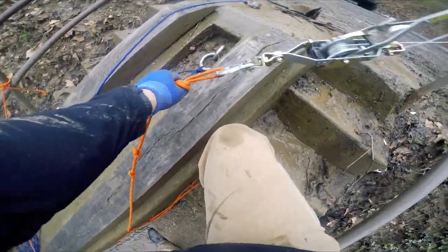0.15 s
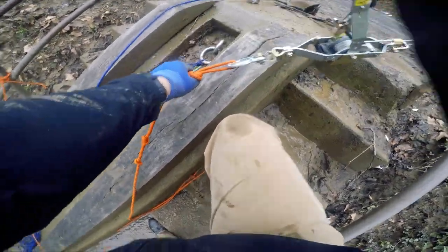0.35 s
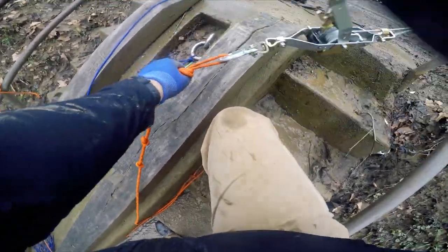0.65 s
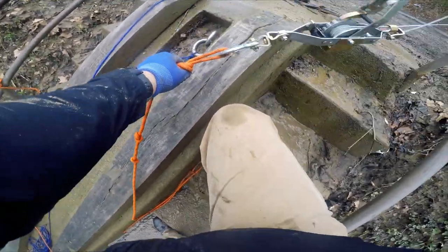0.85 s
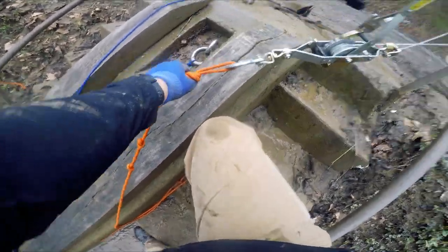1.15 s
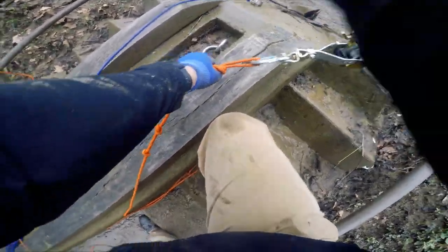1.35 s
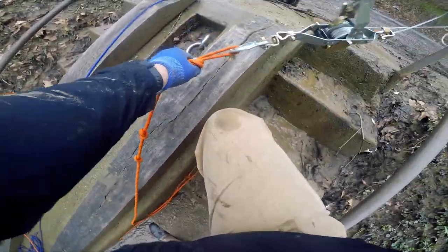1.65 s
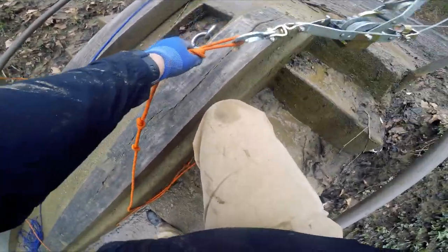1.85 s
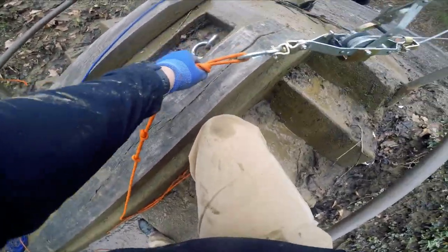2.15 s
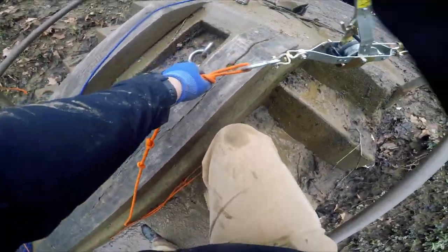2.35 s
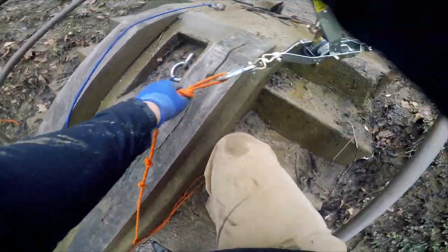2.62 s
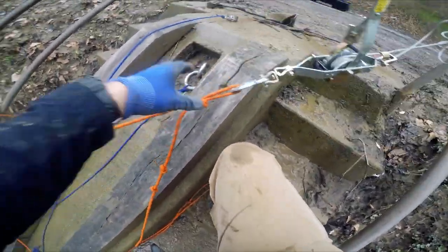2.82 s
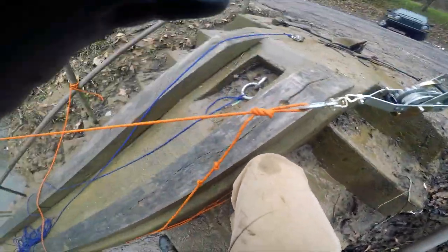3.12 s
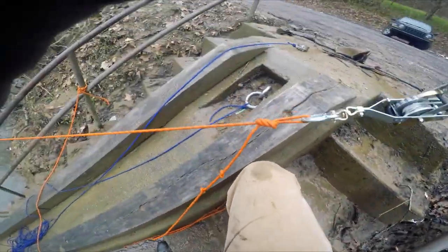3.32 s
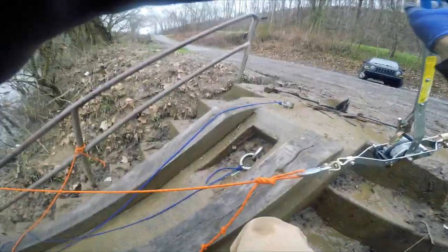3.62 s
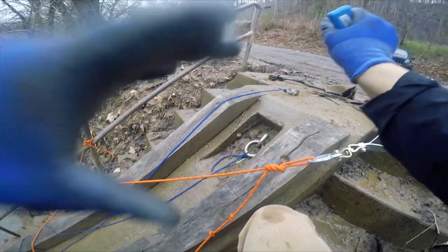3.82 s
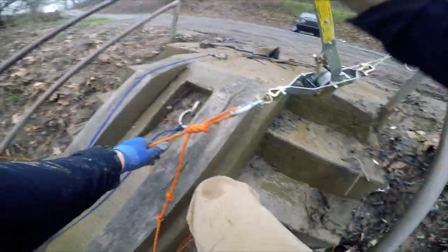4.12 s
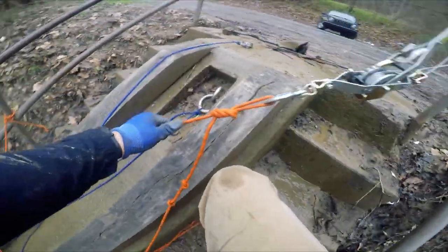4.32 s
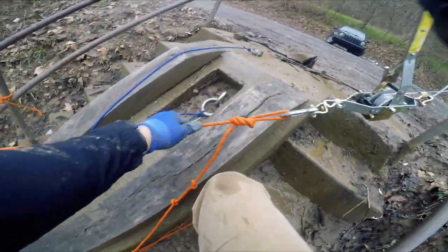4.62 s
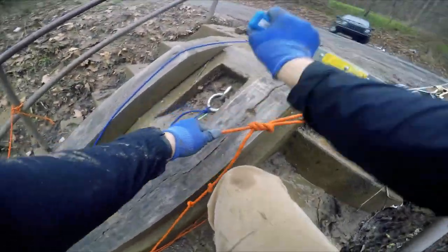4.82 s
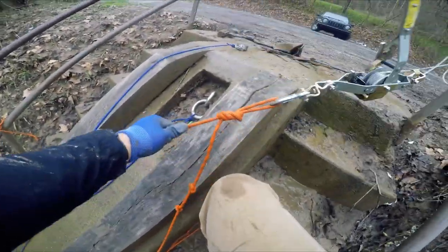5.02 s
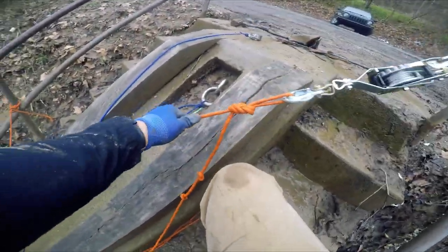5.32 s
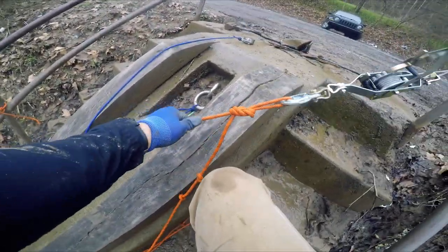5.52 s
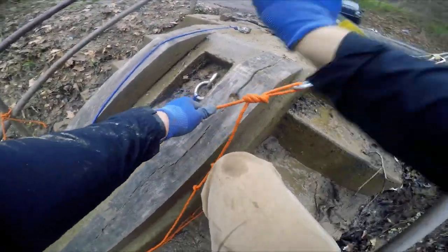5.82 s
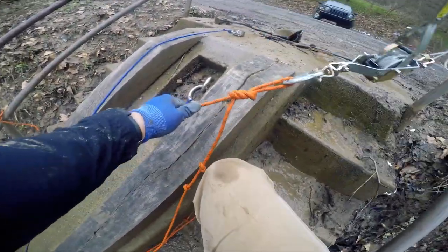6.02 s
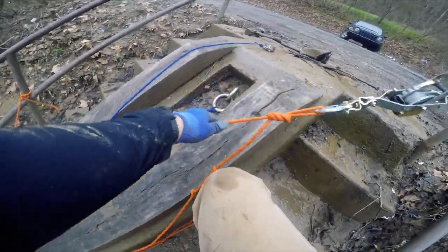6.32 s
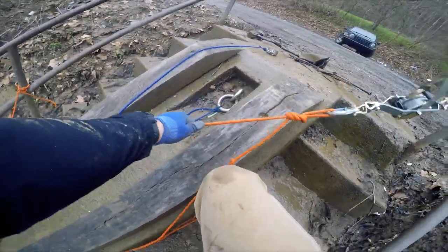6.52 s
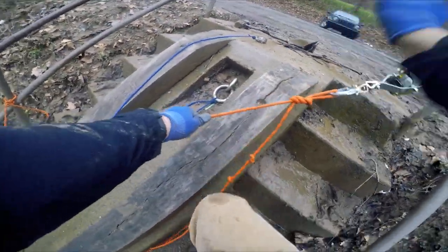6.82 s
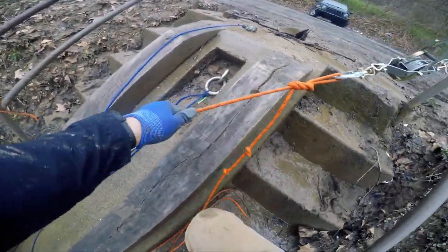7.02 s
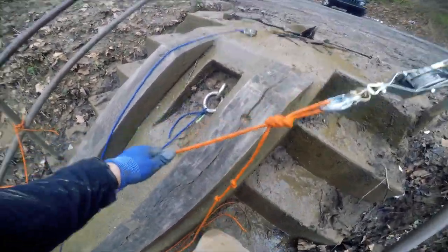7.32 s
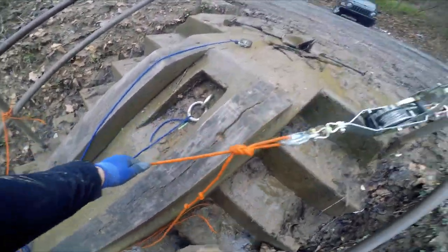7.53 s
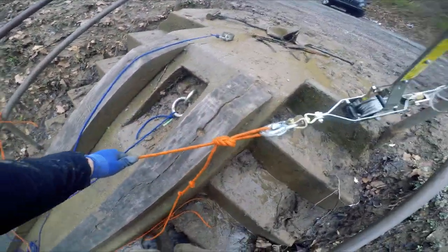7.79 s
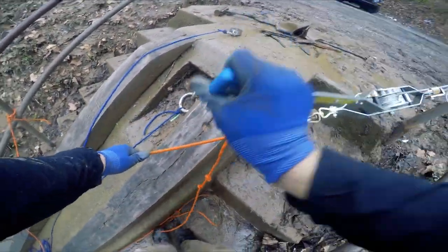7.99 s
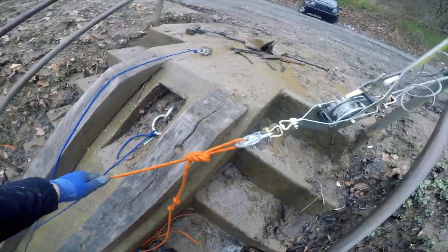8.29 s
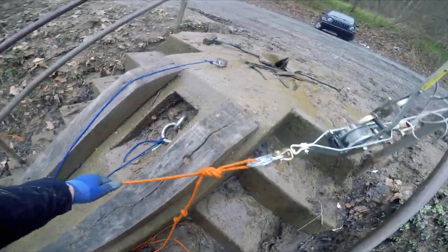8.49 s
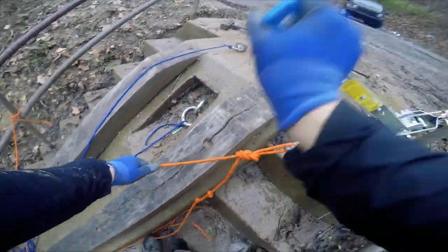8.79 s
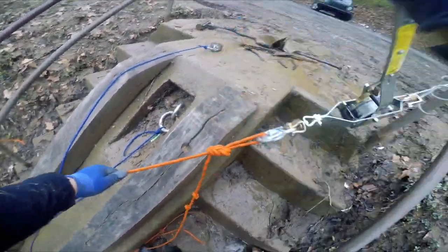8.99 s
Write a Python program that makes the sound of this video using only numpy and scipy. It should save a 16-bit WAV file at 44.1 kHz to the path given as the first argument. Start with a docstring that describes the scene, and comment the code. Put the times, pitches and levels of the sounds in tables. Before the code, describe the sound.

A hand-pumped ratchet winch clicks and snaps sharply in uneven bursts, its handle and hooks clanking, with jacket rustle and soft bumps near the microphone outdoors.

```python
"""On a river bank, a lever ratchet winch is pumped under load, an arm's length from a head-worn camera.
Pawls (small catches) slide up the teeth and snap down, ringing the steel; handle and hooks clank and rattle.
The steel is a crowd of decaying tones; rubbing, jacket, cable and hush are coloured noise.
Bumps on the camera mount are short low tones, and a gloved hand brushes past once with a knuckle tap.
One brief creak is a wavering tone; a faint outdoor hush with a far-off drone lies under it all."""
import sys
import numpy as np
from scipy import signal
from scipy.fft import rfft, irfft, next_fast_len
from scipy.io import wavfile
from scipy.ndimage import uniform_filter1d

SR = 44100
rng = np.random.default_rng(int(sys.argv[2]) if len(sys.argv) > 2 else 0)


def int16_out(signal):
    """Quantize to a 16-bit WAV file."""
    q = np.round(np.clip(np.atleast_2d(signal).T, -1, 1) * 32767)
    wavfile.write(sys.argv[1], SR, q.astype(np.int16))


N = 403506  # length of the scene in samples

# pawl snaps, a few times per stroke, and a few faint ticks of loose parts:
# (time [s], level before trim [dB], push of low modes before sharing [dB], left over right [dB])
SNAPS = [(0.2961, -22, -1.5, -2), (.328, -33.5, -9, 8), (0.3613, -16.5, -0.5, 2.5), (0.4305, -20, -0.5, 2),
         (.502, -43, 2.5, 0), (.588, -36, 0.5, 1), (0.767, -18.5, -0.5, -8), (0.8506, -18, -4.5, -3),
         (0.9184, -18, -3.5, 1), (1.2219, -17.5, -3, 3), (1.2998, -18, -9.5, 1), (1.3828, -18.5, 4.5, 3.5),
         (1.464, -23.5, 0, 2.5), (1.7189, -14.5, 1, -2), (1.8033, -19, -2.5, -0.5),
         (1.8731, -17.5, -3, 4.5), (2.2394, -17.5, -10, 2.5), (2.337, -18.5, -2, 2.5),
         (2.4311, -16, 1.5, -8), (2.9157, -19, -4.5, -6.5), (3.5839, -17, -4.5, 2.5),
         (3.7222, -18.5, -10.5, 9), (4.2891, -17, 2, 0.5), (4.3491, -20, -12.5, -1), (4.5977, -14, -4, 0),
         (4.6675, -19.5, -3.5, 0), (4.7333, -18.5, 1, 1.5), (4.7928, -18.5, -2.5, 1.5),
         (4.806, -23, 3, 2.5), (4.898, -33, 2, -2), (5.0517, -15, 0, 3), (5.1096, -19, -10.5, 1),
         (5.1612, -19.5, -4.5, 1), (5.2536, -19.5, -7.5, 1.5), (5.5691, -20.5, -3, 1),
         (5.6447, -19.5, -8.5, 0), (5.7304, -16.5, 1.5, 2), (5.8052, -22.5, -1, 0),
         (6.023, -18.5, -4.5, -11.5), (6.0942, -19.5, -5.5, -1), (6.162, -17.5, -4, 1),
         (6.5346, -21.5, 0.5, -2), (6.5746, -14, -2.5, -1), (6.656, -16, -7, -1), (6.751, -35, 0, 2),
         (6.814, -32, 4, -2.5), (6.8951, -20, 9.5, 1.5), (7.1317, -20, -9, -4.5), (7.235, -15, -3.5, 2),
         (7.8988, -13.5, -1, 2.5), (7.9844, -21.5, 11, 1), (8.0562, -22.5, -0.5, -3), (8.1102, -18, 6, 3.5),
         (8.2719, -17, -5, -2), (8.335, -20.5, -2.5, -1), (8.714, -22.5, -9.5, 3), (8.7905, -22, 1.5, -3),
         (8.854, -38, 1, -1), (8.9152, -35.5, 4, 0), (9.0281, -15, 5, 1), (9.0951, -16.5, -3.5, -9)]
# the handle turns over or takes up slack: (time [s], level before trim [dB],
# push of low modes before sharing [dB], left over right [dB], chatter of loose parts before shaping [dB])
CLANKS = [(0.0593, -41.5, 17, 3, -44), (0.087, -46, 21, -1, -46.5), (0.132, -45.5, 8, -2, -50),
          (0.2278, -38, -2, 4, -39), (0.6595, -23.5, 11, -1.5, -38), (0.68, -35, 23, -2, -35),
          (0.7077, -20, 8, 4, -30.5), (1.1382, -24, -1, 2, -28.5), (1.2835, -28, 9, 2, -50.5),
          (1.335, -35.5, 1, -1, -42), (1.4243, -34.5, 9, 6, -34), (1.5674, -32, -2.5, -4, -53),
          (1.6201, -19.5, 5, 6, -39), (1.667, -20, 3.5, -1, -27.5), (2.1131, -24, 0, -10, -29),
          (2.6342, -24.5, 15.5, 6.5, -40), (2.675, -24, 10.5, 0, -44), (2.789, -29, -5, -1, -41),
          (3.0343, -34.5, 3, -3, -51), (3.8926, -28.5, 0, 1, -52), (4.0448, -31.5, 15, 1.5, -55),
          (4.0772, -35, 16, 2, -47), (4.228, -28, 0, 8, -38), (4.513, -23.5, 5.5, 0, -40),
          (4.5375, -24, -1, -6.5, -27), (4.97, -23, 1.5, -9, -42), (4.9918, -24, 35, 2, -46),
          (5.0172, -22, 6, -2, -28), (5.499, -32.5, -13, -4, -41.5), (5.8692, -30.5, 8.5, 0.5, -53),
          (5.9305, -20, 15, -1.5, -52), (5.961, -38, 24, -1, -49), (5.9798, -19.5, 10, 0, -36),
          (6.305, -26, -4.5, -5, -28.5), (6.5009, -21, -8, 0, -50.5), (6.6251, -29.5, 8, 1, -57),
          (6.717, -38, -11, 4, -45), (6.92, -47, 10, -6, -45), (6.951, -22.5, 2.5, 0, -32),
          (7.0462, -37, -3, -7, -38.5), (7.5195, -21, 4, -10, -24.5), (7.699, -35, -1, -7, -42),
          (7.814, -28, -6, -9, -30.5), (7.9624, -18, 4.5, -2.5, -40), (8.1588, -23, 5, -0.5, -35),
          (8.2025, -25, 3.5, -5, -35), (8.38, -43.5, 27, 0, -60), (8.482, -23.5, 9, -3, -60),
          (8.5044, -22.5, -0.5, -1, -30), (8.64, -33, -3, -3, -35.5), (8.9846, -20, 11, -0.5, -43),
          (9.008, -26.5, 18, -3, -51)]
# colour of the struck steel: (frequency [Hz], left relative level [dB], right relative level [dB])
STEEL_COLOUR = [(300, -6, -25.5), (786, -37, -30), (1760, -28.5, -25.5), (2270, -15.5, -14),
                (2474, -10.5, -6.5), (2870, -21, -13.5), (3235, -12.5, -8.5), (5020, -13.5, -12.5),
                (5640, -5.5, -6.5), (7058, 1.5, -11.5), (8200, -14.5, -24.5), (9960, -15, -18.5),
                (10530, -26, -22.5), (15100, -31, -33.5)]
# parts that ring on after the frame: (frequency [Hz], relative level [dB], time to fall 60 dB [s])
RINGING_PARTS = [(2605, -6.5, .16), (3220, -18, 0.093), (4370, -16, 0.54), (6500, -2.5, .14),
                 (6470, -13, 0.082), (7436, -4.5, 0.13), (8800, -4.5, 0.11)]
# how long the frame rings: (frequency [Hz], time to fall 60 dB [s])
FRAME_DECAY = [(1200, 0.21), (2500, 0.078), (4500, 0.061), (7000, 0.046), (14000, 0.035)]
# trim of each kind of blow [dB]
SNAP_TRIM_DB, CLANK_TRIM_DB = -4.5, -1
# sharpness of a blow's start (higher is sharper), and the extra per dB of level above the median
SNAP_SHARPNESS, CLANK_SHARPNESS, LOOSE_SHARPNESS, SHARPER_PER_DB = 9.5, 9, 7.0, 0.12
# push of the low modes for loose parts, before sharing [dB]
LOOSE_PUSH_DB = 6.5
# slide before a blow, before shaping: against a snap's level, against a clank's chatter [dB]; swell time [s]
SNAP_SLIDE_DB, CLANK_SLIDE_DB, SLIDE_SWELL_S = -14, 8, 0.0061
# loose parts start chattering this long before a clank, and chatter for this long [s]
CHATTER_LEAD_S, CHATTER_S = 0.014, 0.034
# the hooks jingle on: level against the clank before fading [dB], fading time [s]
JINGLE_DB, JINGLE_DECAY_S = -18.5, 0.041
# one short low creak of the loaded rig:
# (start [s], length [s], middle pitch [Hz], level [dB], left over right [dB])
CREAK = (6.615, .1, 640, -50, -7)
# the operator's heaves as they reach the camera mount: (peak time [s], effort level [dB], length [s])
HEAVES = [(0.15, -53, 0.33), (0.358, -49.5, 0.13), (0.445, -42, 0.069), (0.692, -47.5, .2),
          (1.198, -38, 0.11), (1.401, -39.5, 0.15), (1.625, -47, 0.24), (1.854, -49.5, 0.12),
          (2.168, -38, 0.14), (2.437, -39.5, 0.18), (2.737, -46.5, 1), (2.9, -41.5, 0.045),
          (3.157, -33.5, 0.55), (3.455, -33.5, 0.51), (3.737, -45, 0.12), (4.133, -36.5, 0.2),
          (4.365, -49, 0.43), (4.565, -30.5, 0.098), (4.787, -36, 0.095), (5.026, -43.5, 0.11),
          (5.202, -48, 0.35), (5.389, -44.5, 0.19), (5.725, -38, 0.17), (6.002, -43.5, 0.26),
          (6.114, -46, .11), (6.35, -41, 0.24), (6.683, -38.5, .2), (6.96, -43, 0.46), (7.216, -32, 0.17),
          (7.376, -44, .1), (7.554, -35.5, 0.16), (7.797, -33.5, 0.64), (7.972, -31.5, .13),
          (8.198, -40.5, 0.18), (8.805, -41, 0.064), (9.048, -36.5, 0.21)]
# share of a heave spent rising; fall from its peak to either end [dB]; shape of the peak
HEAVE_RISE, HEAVE_DEPTH_DB, HEAVE_ROUNDNESS = 0.47, 21.5, 1.76
# small movements at all times: middle effort and its spread [dB]
REST_DB, FIDGET_DB = -56.5, 3.5
# colour of the thuds through the mount: (frequency [Hz], relative level [dB])
THUD_COLOUR = [(30, -43.5), (60, -22), (88, -5.5), (112, 3), (150, -2.5), (230, -11.5), (320, -8.5),
               (440, -17.5), (700, -30), (1500, -56.5)]
# colour of the jacket's rustle: (frequency [Hz], relative level [dB])
CLOTH_COLOUR = [(200, -5), (350, -1), (600, 1), (850, -6), (1250, -10), (1900, -10), (3500, -33.5),
                (8000, -52.5)]
# colour of the dragging cable: (frequency [Hz], relative level [dB])
CABLE_COLOUR = [(900, -21), (1800, -14), (2550, -6.5), (3600, 2), (5000, -3.5), (7000, 6), (8300, -13),
                (9600, -3.5), (11500, -33), (15000, -55)]
# the glove rubs over the camera housing: (start [s], length [s], pressure level [dB])
RUBS = [(3.105, 0.084, -23.5), (3.238, 0.011, -34.5), (3.3, 0.015, -30.5), (3.36, 0.027, -41.5),
        (3.44, 0.21, -49.5), (3.735, 0.021, -37.5)]
RUB_ATTACK_S, RUB_RELEASE_S = 0.0073, 0.016
# colour of the rubbing glove: (frequency [Hz], relative level [dB])
GLOVE_COLOUR = [(250, -6), (400, -18), (620, -3.5), (830, -10), (1450, -3), (1800, -6.5), (2250, -1.5),
                (4260, -13), (7100, -8.5), (9500, -23), (15000, -38)]
# a knuckle taps the housing: (time [s], level before its two parts are weighted [dB])
TAP = (3.4245, -21.5)
# colour of the tapped housing: (frequency [Hz], relative level [dB])
HOUSING_COLOUR = [(200, -11.5), (480, 2.5), (700, 9.5), (1000, -22), (1500, -6.5), (2500, -18), (3500, -36),
                  (15000, -50)]
# bumps on the camera mount: (time [s], peak level [dB], pitch [Hz], time to fall 60 dB [s])
BUMPS = [(3.094, -20.5, 160, 0.021), (3.14, -21, 124, 0.063), (3.171, -18.5, 110, 0.069),
         (3.236, -22.5, 136, 0.033), (3.265, -26.5, 107, .07), (3.316, -26.5, 98.5, 0.047),
         (3.368, -25.5, 120, 0.027), (3.436, -20.5, 134, 0.041), (3.487, -18.5, 106, 0.056),
         (3.557, -20.5, 104, 0.044), (3.612, -29, 100, 0.021), (3.756, -24.5, 91.7, 0.049),
         (7.844, -19.5, 127, 0.1)]
# colour of the outdoor hush: (frequency [Hz], relative level [dB])
HUSH_COLOUR = [(40, -20), (110, -3.5), (300, -11), (800, -13), (2500, -17.5), (7000, -19.5), (14000, -49.5)]
# colour of the far-off drone: (frequency [Hz], relative level [dB])
DRONE_COLOUR = [(100, -53.5), (420, -30), (520, -2), (575, -4), (720, -32), (3000, -59.5)]
PORTS = np.array([[1], [-1]])  # left and right signs
TOP_HZ = 15400  # the camera passes nothing much above this


def winch():
    """Snaps, handle clanks and the loose parts they shake all ring the same steel."""
    snaps, clanks = np.array(SNAPS), np.array(CLANKS)
    loose_push_db = np.full(len(clanks), LOOSE_PUSH_DB)
    push_db = np.r_[snaps[:, 2], clanks[:, 2], loose_push_db]
    # louder snaps and clanks are sharper
    snap_sharpness = SNAP_SHARPNESS + SHARPER_PER_DB * (snaps[:, 1] - np.median(snaps[:, 1]))
    clank_sharpness = CLANK_SHARPNESS + SHARPER_PER_DB * (clanks[:, 1] - np.median(clanks[:, 1]))
    loose_sharpness = np.full(len(clanks), LOOSE_SHARPNESS)
    blows = steel_blows(push_db, np.r_[snap_sharpness, clank_sharpness, loose_sharpness])
    snapping, handle, loose = np.split(blows, [len(snaps), len(snaps) + len(clanks)])

    out = np.zeros((2, N))
    for (s, db, _, pan_db), blow in zip(snaps, snapping):
        add(out, *strike(s, blow, db + SNAP_TRIM_DB, pan_db, db + SNAP_SLIDE_DB))
    for (s, db, _, pan_db, chatter_db), blow, parts in zip(clanks, handle, loose):
        add(out, *strike(s, blow, db + CLANK_TRIM_DB, pan_db, chatter_db + CLANK_SLIDE_DB))
        add(out, s - CHATTER_LEAD_S, rattle(parts, chatter_db, db))
    return out


def steel_blows(push_db, sharpness, shared=0.49, patchy_db=4.5, port_spread=1.72, sharp_s=0.0053, count=320):
    """Blows on the winch (blows, 2, samples): one set of fading tones (modes), weighted anew by each contact."""
    t = np.arange(SR // 8) / SR
    crowd_hz = 700 + 15000 * (np.arange(count) + rng.random(count)) / count
    ring_hz, ring_db, ring_t60 = np.transpose(RINGING_PARTS)
    hz = np.r_[crowd_hz, ring_hz]
    t60 = np.r_[over_hz(crowd_hz, FRAME_DECAY), ring_t60]
    modes = np.exp(np.outer(2j * np.pi * hz - np.log(1000) / t60, t)).astype(np.complex64)

    # each weight is part common to all blows, part chance
    chance = rng.standard_normal((len(push_db), len(hz), 3))
    common = shared * np.exp(2j * np.pi * rng.random(len(hz)))
    weights = common + (chance[..., 0] + 1j * chance[..., 1]) / np.sqrt(2)
    # where the tooth is struck favours whole groups of neighbouring modes
    patches = unit(uniform_filter1d(chance[..., 2], size=11, axis=1))
    weights[:, :count] *= gain(patchy_db * patches[:, :count])
    # the ringing parts answer every blow, more or less strongly; the root evens them out
    weights[:, count:] *= gain(ring_db) / np.sqrt(np.abs(weights[:, count:]))
    # a larger push favours the frame's low modes, whatever the blow's level
    low_share = 0.85 / (1 + (hz / 5200) ** 8) + 0.26 * np.exp(-((hz - 2550) / 450) ** 2)
    weights *= gain(np.outer(push_db, low_share))

    # each mode reaches the right port with its own phase
    skew = np.exp(1j * port_spread * hz / (hz + 2500) * rng.standard_normal(len(hz)))
    # changing cable tension nudges the modes from blow to blow, by about 12 Hz
    nudge = np.exp(2j * np.pi * np.outer(12 * rng.standard_normal(len(push_db)), t))
    ports = []
    for column, turn in ((1, 1), (2, skew)):
        ringing = ((weights * turn).astype(np.complex64) @ modes) * nudge
        ports.append(colour(ringing.imag, STEEL_COLOUR, axis=column))
    # a sharp blow spends most of its energy at once; a soft one has less of this early boost
    early_boost = 0.77 / (1 + (t / sharp_s) ** 4)
    attack = gain(np.outer(np.asarray(sharpness) - 2.0, early_boost)) * (1 - np.exp(-t / 0.000037))
    blows = np.stack(ports, 1) * attack[:, None]
    # the first 10 ms of every blow gets the same strength
    return blows / np.sqrt(np.mean(blows[..., :SR // 100] ** 2, axis=(1, 2), keepdims=True))


def strike(s, blow, level_db, pan_db, slide_db):
    """Steel slides on steel for a moment, then strikes; gives the start time and the sound."""
    lead = np.arange(-SR // 50, 0) / SR
    blow = blow * unit(gain(PORTS * pan_db / 2))
    swell = np.exp(lead / SLIDE_SWELL_S) * np.minimum(-lead / 0.0026, 1)
    slide = chatter(len(lead), rate=4000, spread_db=5) * swell
    snap = np.pad(blow, ((0, 0), (len(lead) - 1, 0)))
    return s + lead[0], shaken(slide, blow) * gain(slide_db) + snap * gain(level_db)


def rattle(blow, chatter_db, clank_db):
    """Loose parts chatter around a clank; stray ticks of the hooks die away after it."""
    t = np.arange(SR // 6) / SR
    swell = np.sqrt(np.abs(np.sin(np.pi * np.minimum(t / CHATTER_S, 1))))
    burst = chatter(len(t), rate=1100, spread_db=12) * swell
    fade = np.exp(-t / JINGLE_DECAY_S) * (t > CHATTER_LEAD_S)
    jingle = chatter(len(t), rate=97, spread_db=7) * fade
    return shaken(burst * gain(chatter_db) + jingle * gain(clank_db + JINGLE_DB), blow)


def chatter(size, rate, spread_db):
    """Tiny uneven contacts (rate per second) over a little noise, with unit power."""
    touching = rng.random(size) < rate / SR
    contacts = touching * rng.standard_normal(size) * gain(spread_db * rng.standard_normal(size))
    return unit(contacts + 0.011 * rng.standard_normal(size))


def shaken(contacts, blow):
    """The steel rings anew at each contact; the blow is scaled to keep the power about the same."""
    return signal.fftconvolve(contacts[None], blow / np.sqrt(np.sum(blow ** 2) / 2), axes=1)


def bank(x, wet_db, t60_s):
    """Concrete steps and the slope scatter a thin, short tail of echoes."""
    t = np.arange(SR // 2) / SR
    fade = np.exp(-np.log(1000) * t / t60_s) * (1 - np.exp(-t / 0.0017))
    tail = rng.standard_normal((2, len(t))) * fade
    tail *= gain(wet_db) / np.sqrt(np.sum(tail ** 2) / 2)
    return x + signal.fftconvolve(x, tail, axes=1)[:, :N]


def creak():
    """A brief stick-slip tone that wavers and rises a little as the load comes on."""
    start, length, hz, db, pan_db = CREAK
    out, size = np.zeros((2, N)), int(length * SR)
    pitch = hz * (1 + 0.048 * (np.linspace(-1, 1, size) + walk(200)[:size]))
    tone = unit(np.sin(2 * np.pi * np.cumsum(pitch) / SR) * np.hanning(size))
    add(out, start, tone * gain(db + PORTS * pan_db / 2))
    return out


def body():
    """Every heave thuds through the mount and rustles the jacket; the cable drags while the drum turns."""
    effort_db = effort()
    thud = hiss(THUD_COLOUR, side_db=-12, pan_db=0, rough_db=1.5, rough_rate=48) * gain(effort_db)
    # the jacket is quiet at rest and swells with the arm
    cloth_db = 0.94 * effort_db - 14.5 + 1.5 * walk(16)
    cloth = hiss(CLOTH_COLOUR, side_db=-6, pan_db=0.5, rough_db=-0.5, rough_rate=90) * gain(cloth_db)
    # the drum turns around each snap and clank; only a trace of drag is left between them
    turning = np.zeros(N)
    for s, *_ in SNAPS + CLANKS:
        add(turning, s - 0.06, np.hanning(int(0.17 * SR)))
    drag = gain(0.5 * effort_db - 31) * (0.044 + np.minimum(turning, 1))
    cable = hiss(CABLE_COLOUR, side_db=-1, pan_db=-1.0, rough_db=2.5, rough_rate=590) * drag
    return thud + cloth + cable


def effort():
    """The operator's effort in dB: every heave swells and fades over a restless minimum."""
    t = np.arange(0, N / SR, 0.002)
    peak_s, db, length = np.transpose(HEAVES)[..., None]
    # distance from the peak: 0 at the peak, 1 at either end
    away = np.maximum((peak_s - t) / HEAVE_RISE, (t - peak_s) / (1 - HEAVE_RISE)) / length
    power = np.sum(gain(db - HEAVE_DEPTH_DB * away ** HEAVE_ROUNDNESS) ** 2, axis=0)
    rest_power = gain(REST_DB + FIDGET_DB * walk(11)) ** 2
    return 10 * np.log10(curve(np.c_[t, power]) + rest_power)


def glove():
    """Rubber-coated cloth catches and slips across the housing, and a knuckle taps it in passing."""
    rub = hiss(GLOVE_COLOUR, side_db=-0.5, pan_db=-0.5, rough_db=2.5, rough_rate=450)
    # sound bounces between hand and housing, so hollow resonances slide as the gap changes
    now = np.arange(N)
    lag = SR * 0.0018 * np.exp(0.196 * walk(6.9))
    bounced = np.array([np.interp(now - lag, now, port) for port in rub])
    rub = unit(rub + 0.75 * bounced) * pressure(RUBS)
    add(rub, TAP[0], gain(TAP[1]) * knuckle())
    return rub


def knuckle():
    """A tap is a crack of noise coloured by the housing plus a low knock."""
    t = np.arange(SR // 20) / SR
    crack = unit(colour(rng.standard_normal(len(t)) * t * np.exp(-t / 0.001), HOUSING_COLOUR))
    # the knock falls in pitch as the finger settles on the shell
    hz = 140 + 520 * np.exp(-t / 0.0042)
    knock = np.sin(2 * np.pi * np.cumsum(hz) / SR) * np.exp(-t / 0.011) * (1 - np.exp(-t / 0.00092))
    return gain(-5.0) * crack + gain(7.5) * knock


def pressure(rubs):
    """Strength of the rubbing: each rub grips quickly, holds and lets go."""
    t = np.arange(N) / SR
    total = np.zeros(N)
    for s, length, db in rubs:
        before, after = np.maximum(s - t, 0), np.maximum(t - s - length, 0)
        total += gain(db) * np.exp(-before / RUB_ATTACK_S - after / RUB_RELEASE_S)
    return total


def bumps():
    """The camera rocks on its mount after each soft nudge: a short, low, fading tone."""
    out, t = np.zeros(N), np.arange(SR // 5) / SR
    for s, db, hz, t60 in BUMPS:
        fade = np.exp(-np.log(1000) * t / t60) * (1 - np.exp(-(t * hz) ** 2))
        rocking = np.sin(2 * np.pi * hz * t) * fade
        add(out, s - 0.5 / hz, gain(db) * rocking / np.abs(rocking).max())
    return out


def outdoors():
    """The faint hush of river and trees, with a far-off drone in it: two slowly wavering noises."""
    hush = hiss(HUSH_COLOUR, side_db=-3, pan_db=0, rough_db=1.5, rough_rate=3)
    drone = hiss(DRONE_COLOUR, side_db=0, pan_db=0, rough_db=3, rough_rate=2)
    return hush * gain(-60.0) + drone * gain(-70)


def hiss(spectrum, side_db, pan_db, rough_db, rough_rate):
    """Stereo coloured noise of unit power whose strength flutters at random."""
    mid, side = rng.standard_normal((2, N))
    both = (mid + PORTS * gain(side_db) * side) * gain(PORTS * pan_db / 2)
    return unit(colour(both * gain(rough_db * walk(rough_rate)), spectrum))


def walk(rate):
    """Random levels, rate of them per second, joined by smooth slopes; spread near one."""
    k = max(int(SR / rate), 1)
    steps = np.repeat(rng.standard_normal(N // k + 1), k)
    return uniform_filter1d(steps, k)[:N] * np.sqrt(3 / 2)


def colour(x, rows, axis=1):
    """Filter with the given spectrum that never sounds early (minimum phase, built from the cepstrum)."""
    n = 2 * next_fast_len(x.shape[-1] // 2 + 512)
    level_db = over_hz(np.arange(n // 2 + 1) * SR / n, rows, axis)
    cepstrum = irfft(np.log(gain(level_db)))
    # folding the second half onto the first removes any sound before its cause
    cepstrum[1:n // 2] *= 2
    cepstrum[n // 2 + 1:] = 0
    return irfft(rfft(x, n) * np.exp(rfft(cepstrum)), n)[..., :x.shape[-1]]


def over_hz(hz, rows, axis=1):
    """One column of a frequency table, read on a log axis."""
    rows = np.array(rows)
    return np.interp(np.log(hz + 1), np.log(rows[:, 0]), rows[:, axis])


def curve(rows):
    """The second column of a time table, for every sample."""
    return np.interp(np.arange(N) / SR, rows[:, 0], rows[:, 1])


def add(out, s, sound):
    """Mix a sound in at a time in seconds."""
    start = max(int(s * SR), 0)
    part = sound[..., :max(N - start, 0)]
    out[..., start:start + part.shape[-1]] += part


def gain(db):
    """Decibels to a plain multiplier."""
    return 10 ** (np.asarray(db) / 20)


def unit(x):
    """Scale to an average strength (rms) of one."""
    return x / np.sqrt(np.mean(x ** 2))


def scene():
    """Winch, operator and river bank together."""
    near = bank(winch(), wet_db=-24.0, t60_s=0.14) + creak()
    return near + body() + glove() + bumps() + outdoors()


def record(dry, port_hz=680, port_q=1.0):
    """The two microphone ports fall out of step in the mids; the camera thins bass, rounds peaks, cuts the top."""
    w = 2 * np.pi * port_hz
    # an allpass turns the phase of the right port and leaves its levels alone
    allpass = signal.bilinear([1, -w / port_q, w * w], [1, w / port_q, w * w], SR)
    ports = np.array([dry[0], signal.lfilter(*allpass, dry[1])])
    thinned = signal.sosfilt(signal.butter(2, 45, "high", fs=SR, output="sos"), ports)
    rounded = 0.85 * np.tanh(thinned / 0.85)
    return signal.sosfilt(signal.ellip(8, 0.2, 70, TOP_HZ, fs=SR, output="sos"), rounded)


dry = scene()
out = record(dry)
int16_out(out)
```